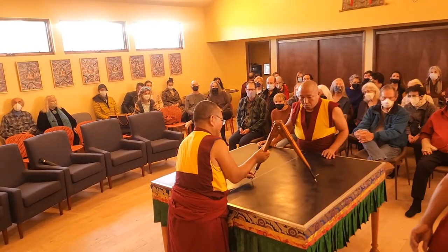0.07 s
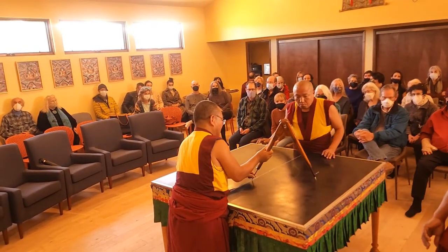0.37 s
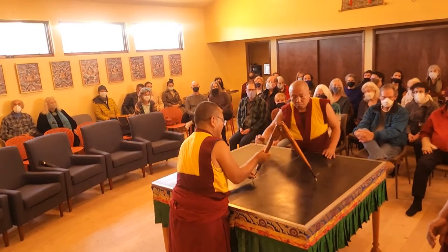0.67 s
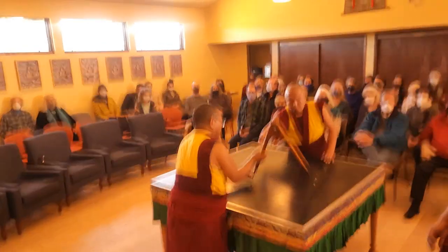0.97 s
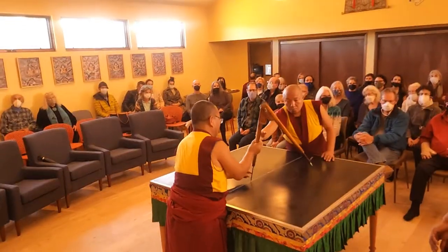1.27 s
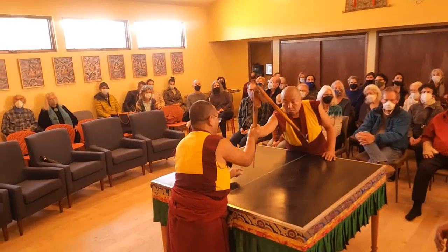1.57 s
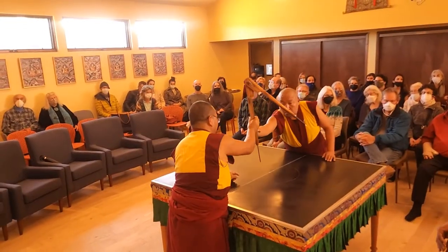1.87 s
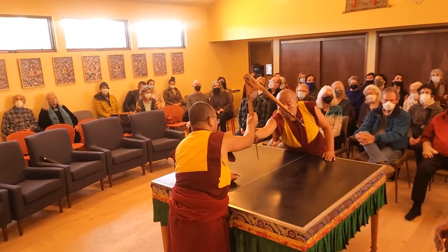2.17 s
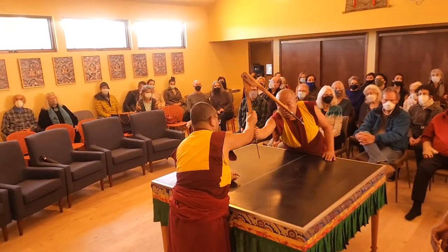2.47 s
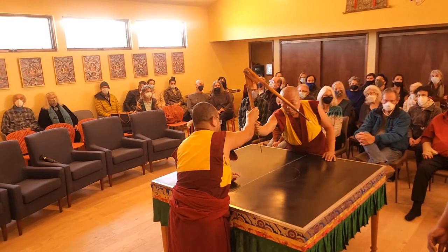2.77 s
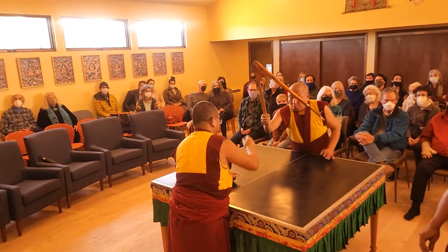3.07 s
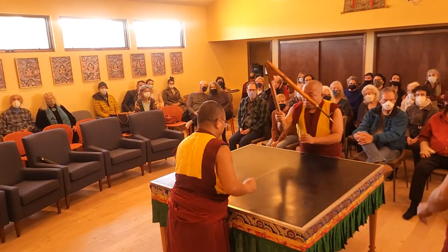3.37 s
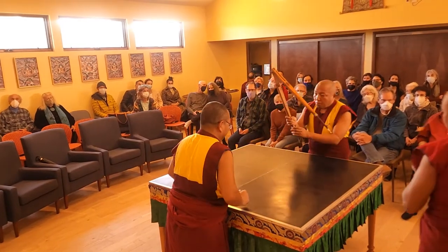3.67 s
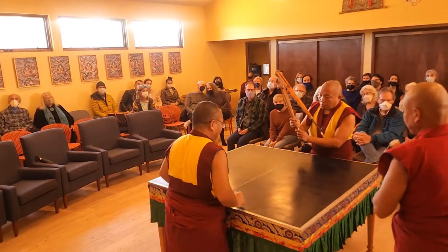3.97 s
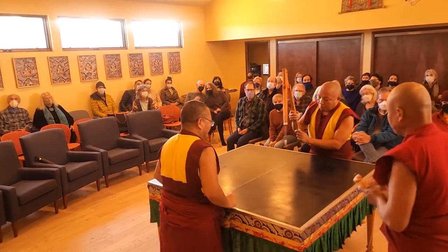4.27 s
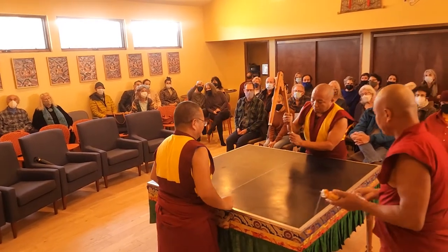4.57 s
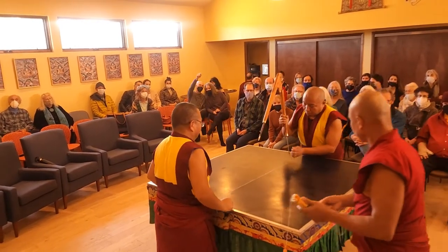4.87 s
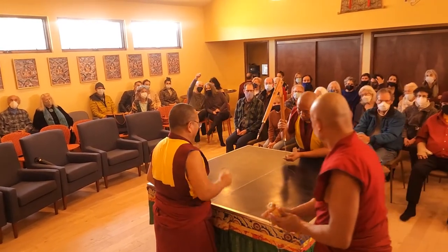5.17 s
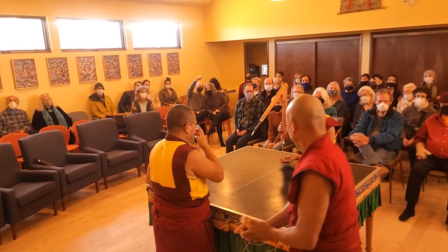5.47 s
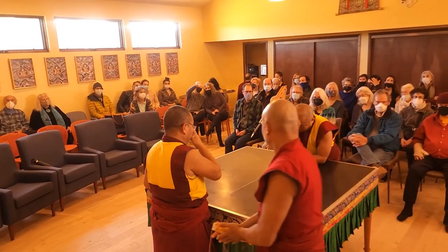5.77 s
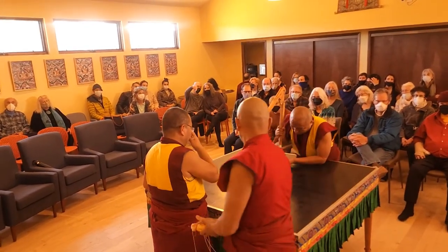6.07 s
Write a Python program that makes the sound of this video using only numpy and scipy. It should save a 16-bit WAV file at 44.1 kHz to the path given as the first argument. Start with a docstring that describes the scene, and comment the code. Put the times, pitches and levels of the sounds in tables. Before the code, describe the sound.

In a quiet hall, big wooden tools tap, clonk and briefly rattle against a tabletop, loudest near the start, with a few sharp clacks ringing lightly in the room. A calmer stretch follows, with scattered soft bumps and faint brushing robes. Then a hand rubs on the microphone more heavily and several more knocks land at the end. Everything is close and leans to the left.

```python
"""Large wooden drawing tools knock, rattle and skid on a table close to a hand-held microphone.
Solid contact conducts the knocks and soft handling thumps, so they arrive dry and boomy, mostly on the
left; a few sharp clacks travel through the air and reverberate in the quiet hall. Each knock leaves the
microphone housing shuddering, and a hand excites the same resonances by stick-slip friction.
Faint squeaks, finger clicks and rustling cloth lie over the noise of the room."""
import sys
import numpy as np
from scipy import signal
from scipy.fft import rfft, irfft, next_fast_len
from scipy.io import wavfile

SR = 44100
rng = np.random.default_rng(int(sys.argv[2]) if len(sys.argv) > 2 else 0)


def persist_wave(psi):
    """Save psi, clipped to +-1, as 16-bit WAV."""
    counts = np.round(np.clip(psi, -1, 1) * 32767).astype(np.int16)
    wavfile.write(sys.argv[1], SR, np.atleast_2d(counts).T)


N = 278050

# Wooden knocks and soft, dull handling thumps carried into the microphone.
# Each row: start in seconds, strength in dB, boom weight in dB, hollow ring in dB,
# contact softness in dB lost per octave, ring length as a multiple of the modal decay time.
IMPACTS = [(0.166, -29.5, -23, 1, 5, 0.7), (0.19, -26.5, -16, 10.5, 16, 1.4),
           (0.228, -27.5, 0.5, 6.5, 6, 1.1), (0.346, -39.5, 12, 6, 10.5, 0.79),
           (.538, -21.5, 2.5, 16.5, 11.5, 0.62), (.623, -28.5, -13, 14, 11.5, 1.3),
           (.661, -29, -27, 17, 16.5, 1.04), (0.718, -7.5, -8.5, 13.5, 12.5, 0.45),
           (0.7236, -19, -18, 1, 11, 0.94), (0.7544, -19.5, -15, -26, -2, 0.63),
           (0.7702, -14.5, -5, -25, 1.5, 0.84), (0.905, -40.5, 16, 15, 11, 0.83),
           (1.018, -6, 7, 6.5, 6, 0.37), (1.035, -8, -19, 12.5, 6.5, 0.84), (1.085, -17, -10, 11, 14, 2),
           (1.107, -5, -8, 7, 8, 0.71), (1.122, -3, -2.5, 6, 5.5, 0.63), (1.135, -12, -1.5, -5, 5.5, 1.2),
           (1.158, -21, 2, -17, 2.5, 0.56), (1.166, -12.5, -19, 13, 9.5, 0.77),
           (1.178, -19.5, -3, 13, 11, 1), (1.2196, -25.5, -15, 10, 3.5, 0.9), (1.264, -21, -13, 5, 5, 0.99),
           (1.295, -13.5, -39, 7, 6, 0.71), (1.352, -32.5, 10, 9, 8, 0.95), (1.444, -36, 9, 0, 3.5, 0.98),
           (1.474, -29, -15, -7, 5.5, 1.3), (1.5515, -26, -7, 8, 2.5, 0.99), (1.615, -18, -5, -4, 15, 0.58),
           (1.724, -25, -3, 6.5, 11.5, 1.15), (2.193, -26.5, -10, -3, 15.5, 0.98),
           (3.059, -28, -8.5, -20, 17.5, 1.1), (3.25, -28.5, -5.5, -15.5, 17, 1.06),
           (3.615, -31, -19, 6.5, 10.5, 0.66), (3.797, -32.5, 4.5, -12, 14, 1.15),
           (3.981, -32, -25, -7.5, 8.5, 0.88), (4.007, -39.5, -3.5, 26, 14.5, 0.65),
           (4.225, -23.5, -14, 2.5, 9.5, 0.6), (4.557, -40.5, -21, 5.5, 4.5, 2.2),
           (5.192, -38, -1, 7, 9, 0.66), (5.347, -17.5, -36, -11, 13, 1.1),
           (5.517, -19.5, -14.5, -14, 16, 0.74), (5.541, -25.5, -15, -9, 15, 0.67),
           (5.551, -21.5, -27, -3, 8, 0.44), (5.623, -25.5, -29, -32, 36, 0.49),
           (5.839, -25.5, -19, -12, 17, 0.5), (5.851, -23, -18, 2, 9, 0.83),
           (5.874, -25.5, -12, -12, 17, 0.71), (6.0584, -11.5, -12.5, 4.5, 9, 0.98),
           (6.093, -27, 14.5, 17, 15, 0.63), (6.111, -27, 11, 21, 15, .9), (6.145, -22, -9, 15, 8, 0.67)]
# Spectrum of cloth and finger noise. Each row: frequency in Hz, relative level in dB.
RUSTLE_SPECTRUM = [(1200, 11), (2500, 2.5), (4000, 1.5), (5200, 0.5), (7000, -1), (9000, -9.5), (11800, -4),
                   (15500, -15)]


def knock_rings(scatter_db=3.0, detune=0.04, heavy_boom=0.062, deepening=0.15):
    """Modal superposition: an impact excites every mode; its force and position set their balance."""
    # Modes of the struck body. Each row: frequency in Hz, relative level in dB, T60 in seconds.
    body_modes = [(63.53, 0.5, 0.22), (129.2, -2.5, 0.16), (185, -1, 0.076), (223.2, 2, 0.043),
                  (270.5, 4, .045), (306.3, -1, .05), (358, -9.5, 0.069), (458.8, -9, 0.086),
                  (563, -1.5, 0.031), (645, -8.5, 0.099), (731, -7.5, .04), (1067.4, -16.5, 0.039),
                  (1407, -0.5, 0.041), (1980, -11.5, 0.021)]
    start, boom_db, ring_db, clack_db, crack_db, _ = impact_levels()
    ring_length = np.clip(np.array(IMPACTS)[:, -1], 0.3, 2)   # set by the grip
    low_pan_db = 19 - 0.23 * (ring_db - ring_db.mean())   # harder knocks shake both sides
    registers = np.array([boom_db - 0.5, ring_db - 0.5, clack_db - 1.5, crack_db - 1.5])
    out = np.zeros((2, N))
    for k, (hz, mode_db, t60) in enumerate(body_modes):
        register = np.interp(hz, [70, 200, 420, 600, 900, 1450], [0, 1, 1, 2, 2, 3])
        weights = np.maximum(1 - abs(np.arange(len(registers)) - register), 0)
        level_db = mode_db + weights @ registers
        pan_db = low_pan_db if hz < 450 else 7.5
        if k == 0:   # only heavy blows rock the whole body
            level_db += heavy_boom * (boom_db - boom_db.max())
            pan_db = pan_db - 5
        if k == 1:   # the more weight behind a blow, the deeper its boom
            level_db -= deepening * (boom_db - ring_db)
        strength, lean, lag, shift = rng.standard_normal((len(start), 4)).T
        gain = from_db(level_db + scatter_db * strength)
        pan_db = pan_db + 1.5 * lean
        pitch = hz * np.exp(detune * shift * (register > 0))   # upper modes shift with the spot hit
        for i in range(len(start)):
            mode = damped_mode(pitch[i], t60 * ring_length[i], 1 / hz, lag_cycles=0.25 * abs(lag[i]))
            add(out, start[i], gain[i] * panned(pan_db[i]) * mode)
    return out


def impact_levels(knee_hz=269):
    """Soft contact is a low-pass filter. Gives starts and boom, ring, clack, crack and snap levels."""
    start, strength_db, weight_db, hollow_db, softness_db, _ = np.transpose(IMPACTS)
    clack_db, crack_db, snap_db = (strength_db - np.maximum(softness_db, 0) * np.log2(hz / knee_hz)
                                   for hz in (890, 1685, 5030))
    return start, strength_db + weight_db, strength_db, clack_db + hollow_db, crack_db, snap_db


def knock_cracks(crack_t60=0.034, snap_t60=0.014, hard_above_db=-36):
    """Contact transients: a brief force has a broad spectrum, and only hard contacts add a snap."""
    # Spectra of the midrange crack and the treble snap. Each row: frequency in Hz, relative level in dB.
    crack_spectrum = [(900, -15), (1600, 13), (2800, -0.5), (3600, -12), (5000, -16), (8000, -43),
                      (16000, -63.5)]
    snap_spectrum = [(2500, -7.5), (4200, 4), (6000, -1), (9300, -10.5), (12300, 1), (15500, -13)]
    out, t = np.zeros((2, N)), np.arange(4096) / SR
    attack = np.minimum(t / 0.002, 1)
    for start, *_, crack_db, snap_db in zip(*impact_levels()):
        crack = from_db(crack_db - 9 - 60 * t / crack_t60) * noise(crack_spectrum, len(t), coherence=1)
        hiss = noise(snap_spectrum, len(t), coherence=0.088, imbalance=1)
        snap = from_db(snap_db + 0.5 - 60 * t / snap_t60) * hiss
        hardness = min(from_db(snap_db - hard_above_db), 1)
        add(out, start, attack * (crack + hardness * panned(-4) * snap))
    return out


def clonks(pivot_hz=724, swell_s=0.0006):
    """Free vibration of wood: hollow clonks, each with its own loudness, brightness and pitch."""
    # Collisions of two tools. Each row: start in seconds, level in dB, tilt in dB per octave,
    # pitch as a multiple of the modal frequencies.
    collisions = [(.7555, -25.5, 7.5, 0.97), (0.7698, -6.5, -2, 1.01), (1.2975, -29, -3, .98),
                  (1.473, -42, -7, 1.0), (1.5564, -21.5, -7, .92), (1.611, -40, -3.5, .93),
                  (3.617, -43, -10, 0.95)]
    # Modes of the hollow-ringing tool. Each row: frequency in Hz, relative level in dB, T60 in seconds.
    tool_modes = [(394.9, -3.5, 0.12), (580.4, -0.5, 0.042), (753.6, 1.5, .055), (1012, -21, 0.06),
                  (1270, -20.5, .03), (1570, -16, .025), (2200, -9, 0.028), (2780, -12.5, 0.014)]
    out = np.zeros((2, N))
    for start, level_db, tilt_db, pitch in collisions:
        for hz, mode_db, t60 in tool_modes:
            gain = from_db(level_db + mode_db + tilt_db * np.log2(hz / pivot_hz)) * rng.choice([-1, 1])
            mode = damped_mode(hz * pitch, t60, swell_s, lag_cycles=0.32 * rng.standard_normal())
            add(out, start, gain * mode)
    return panned(8) * out


def bounces(swell_s=0.00021):
    """Elastic rebound: a tip ticks on the table, and the harder the spot, the higher the pitch."""
    # Rebounds of the tip. Each row: start in seconds, level in dB, pitch in Hz.
    rebounds = [(0.72, -27.5, 1240), (1.0201, -12, 2450), (1.036, -19, 1900), (1.0861, -23, 1710),
                (1.1055, -21, 1340), (1.1242, -13, 2825), (1.1258, -19.5, 4590), (1.1455, -21, 2800),
                (1.158, -31.5, 4450), (1.1717, -27.5, 4370), (1.2287, -36, 2800), (1.267, -29.5, 1720),
                (1.299, -37.5, 2200), (6.063, -28.5, 1830), (6.0675, -28, 1620), (6.1477, -43, 1805)]
    # Modes of a rebound. Each row: multiple of the pitch, relative level in dB, T60 in pitch cycles.
    tip_modes = [(.55, -2.5, 26), (0.999, 2, 17), (1.68, -14.5, 14), (2.15, -13.5, 8.5), (2.8, -22, 9.4)]
    out = np.zeros((2, N))
    for start, level_db, hz in rebounds + rattle():
        for multiple, mode_db, cycles in tip_modes:
            gain = from_db(level_db + mode_db) * rng.choice([-1, 1])
            lag_cycles = 0.15 * rng.standard_normal()
            add(out, start, gain * damped_mode(hz * multiple, cycles / hz, swell_s, lag_cycles))
    return panned(5.5) * out


def rattle(mean_gap_s=0.0035, scatter_db=1.5, low_hz=1355, high_hz=4600):
    """Intermittent contact: loose sticks touch at uneven times and spots, giving more rebound rows."""
    # Bursts of rattling. Each row: start in seconds, length in seconds, level in dB.
    bursts = [(1.022, .026, -33), (1.073, .05, -38.5), (1.124, .066, -40.5), (1.205, .035, -50),
              (1.27, .046, -45)]
    rows = []
    for start, length, level_db in bursts:
        gap, spot, force = rng.random((3, 48))
        delay = np.cumsum(mean_gap_s * (0.5 + gap)) - mean_gap_s / 2
        hz = low_hz * (high_hz / low_hz) ** spot
        touches = np.transpose([start + delay, level_db + scatter_db * (2 * force - 1), hz])
        rows += list(touches[delay < length])
    return rows


def skids(slips_per_s=620, scatter_db=5):
    """Stick-slip friction of wood on wood: a run of random impulses drives a stick's resonances."""
    # Slides of the stick. Each row: start in seconds, fade time in seconds, level in dB.
    slides = [(0.168, 0.075, -50), (0.722, 0.0069, -35.5), (1.017, 0.023, -27.5), (1.094, 0.093, -43.5),
              (1.298, 0.052, -54.5), (4.235, 0.0067, -53.5)]
    # Resonances of the stick. Each row: frequency in Hz, bandwidth in Hz, relative level in dB.
    stick_modes = [(1022, 170, 0), (1540, 210, -14), (2420, 900, -9.5), (2910, 590, -11),
                   (3500, 740, -19.5)]
    slips, t = np.zeros((2, N)), np.arange(8192) / SR
    for start, length, level_db in slides:
        sizes = from_db(scatter_db * rng.standard_normal((2, len(t)))) * rng.choice([-1, 1], len(t))
        impulses = (rng.random(len(t)) < slips_per_s / SR) * sizes
        add(slips, start, from_db(level_db) * unit_rms(impulses) * np.exp(-(t / length) ** 2))
    rings = [from_db(mode_db) * np.sqrt(SR / (np.pi * width)) * resonate(slips, hz, width)
             for hz, width, mode_db in stick_modes]
    return panned(13.5) * sum(rings)


def clacks(direct_db=10, direct_t60=0.0078, treble_loss_per_db=0.7643):
    """Direct and reverberant sound: a clack some way off is a short tick, then mostly hall."""
    # Distant strikes. Each row: start in seconds, level in dB.
    strikes = [(0.412, -90.5), (0.457, -67.5), (.465, -54.5), (1.066, -48.5), (1.091, -50), (1.125, -38),
               (1.549, -53), (1.553, -40)]
    # Spectrum of a clack. Each row: frequency in Hz, relative level in dB.
    spectrum = [(500, 9.5), (1500, -6.5), (2500, -6), (3600, 2), (5500, -2), (7500, -0.5), (9500, -5),
                (12500, 2), (15500, -8)]
    out, tail = np.zeros((2, N)), hall_tail(spectrum)
    t = np.arange(tail.shape[1]) / SR
    direct = noise(spectrum, len(t), coherence=0.27, imbalance=0.46)
    clack = tail + from_db(direct_db - 60 * t / direct_t60) * direct
    treble = signal.sosfiltfilt(signal.butter(2, 8000, "high", fs=SR, output="sos"), clack)
    mean_db = np.mean(strikes, axis=0)[1]
    for start, level_db in strikes:
        treble_db = 2 - treble_loss_per_db * (level_db - mean_db)   # light clacks thin, hard ones full
        add(out, start, from_db(level_db) * panned(-6.5) * (clack + (from_db(treble_db) - 1) * treble))
    return out


def rubbing(jerk_db=2.5, grain_db=1.0):
    """Forced vibration: skin, moved by the hand or jolted by a knock, sticks and slips on the housing."""
    # Hand strokes. Each row: start in seconds, length in seconds, level in dB, rumble weight in dB.
    strokes = [(0, 0.098, -65, 6), (0.47, 0.055, -48, 8.5), (0.52, 0.2, -44, -2),
               (0.798, 0.21, -44.5, -7.5), (1.034, 0.28, -44, 5), (1.238, 0.23, -46.5, -13),
               (1.534, 0.093, -33.5, -11), (1.58, 0.14, -40.5, 0.5), (1.758, 0.14, -59.5, 8.5),
               (1.896, 0.17, -58, 1.5), (2.274, 0.088, -51.5, 0), (2.349, 0.047, -47, -5),
               (2.39, 0.049, -54.5, -9), (2.499, 0.08, -64, -9), (2.695, 0.55, -53, -6),
               (3.242, 0.4, -55, -7.5), (3.812, 0.13, -71.5, 18), (4.059, 0.202, -51, -5.5),
               (4.385, 0.18, -47.5, -12), (4.545, 0.19, -40.5, -3), (4.745, 0.18, -39, 2.5),
               (4.916, 0.34, -43, -7), (5.27, 0.35, -40.5, -3.5), (5.473, 0.3, -39, 0.5),
               (5.769, 0.39, -38.5, 3), (6.16, 0.17, -68.5, 24)]
    # Resonances of the housing. Each row: frequency in Hz, bandwidth in Hz, relative level in dB,
    # left minus right in dB.
    housing_modes = [(38.2, 13, -6, 12.5), (61.6, 40, -0.5, 21), (131.2, 25, 0, 19), (176, 58, -7.5, 18),
                     (271.5, 94, -1.5, 20), (345.4, 54, -5, 14), (369, 39, -12, 16.5),
                     (478.6, 56, -17.5, 2.5), (682, 140, 1.5, 2.5), (1220, 280, -16.5, -9),
                     (1420, 115, -7.5, 15), (1854, 210, -13, -5.5), (2200, 140, -17.5, -2),
                     (2800, 720, -30, 0), (3980, 220, -28, -4)]
    start, length, stroke_db, weight_db = np.transpose(strokes)
    knock_s, boom_db, ring_db, clack_db, *_ = impact_levels()
    # Hand and knocks each drive three registers: low rumble, middle rub, high scratch.
    hand = [movement_envelope(start, length, level_db, edge_s=0.015, rest_db=-66) * from_db(trim_db)
            for level_db, trim_db in ((stroke_db + weight_db, -1.5), (stroke_db, 0), (stroke_db, -20))]
    jolts = [shudder(knock_s, level_db)
             for level_db in (np.minimum(boom_db, ring_db) - 13.5, ring_db - 17, clack_db - 38)]
    forces = np.hypot(hand, jolts)
    slips = unit_rms(from_db(jerk_db * drift(rate=45) + grain_db * drift(rate=220)))
    out = np.zeros((2, N))
    for hz, width, level_db, pan_db in housing_modes:
        shared, right_only = rng.standard_normal((2, N))
        friction = slips * np.array([shared, (shared + right_only) / np.sqrt(2)])
        band = unit_rms(resonate(friction, hz, width))
        force = forces[np.searchsorted([155, 600], hz)]   # register boundaries in Hz
        out += band * force * from_db(level_db) * panned(pan_db)
    return out


def shudder(start, level_db, rise_s=0.0038, t60=0.31):
    """Energy storage: each knock charges the housing, whose amplitude swells and decays exponentially."""
    kicks = np.zeros(N)
    kicks[np.round(start * SR).astype(int)] = from_db(level_db) ** 2
    retained = from_db(-60 / (t60 * SR)) ** 2
    energy = signal.lfilter([1], [1, -retained], kicks + 1e-18)
    pole = np.exp(-1 / (rise_s * SR))
    return signal.lfilter([1 - pole], [1, -pole], np.sqrt(energy))


def squeaks(waver_share=0.09):
    """Friction tones of the grip: narrow bands of noise that swell, sink a little in pitch and fade."""
    # Squeaks. Each row: start in seconds, length in seconds, pitch in Hz, fall in Hz, level in dB.
    glides = [(2.259, 0.083, 1824, 29.7, -77.5), (2.299, 0.077, 1420, 150, -71.5),
              (2.35, .12, 1915, 100, -80.5), (2.433, 0.29, 1757, 45.15, -86.5), (3.41, 0.19, 5690, 70, -84)]
    out = np.zeros((2, N))
    for start, length, hz, fall_hz, level_db in glides:
        progress = np.linspace(0, 1, int(length * SR))
        waver = (drift(waver_share * hz) + 1j * drift(waver_share * hz))[:len(progress)]
        phase = 2 * np.pi * np.cumsum(hz - fall_hz * progress) / SR
        tone = unit_rms(np.real(waver * np.exp(1j * phase)))
        envelope = np.sqrt(abs(np.sin(np.pi * progress)))
        add(out, start, from_db(level_db) * panned(0) * envelope * tone)
    return out


def finger_ticks(t60=0.0031):
    """Heavily damped transients: tiny dry clicks under the fingers."""
    # Clicks. Each row: start in seconds, relative level in dB.
    clicks = [(4.889, -54), (5.434, -50), (5.523, -51), (5.678, -47.5), (5.835, -53)]
    out, t = np.zeros((2, N)), np.arange(1024) / SR
    for start, level_db in clicks:
        envelope = from_db(level_db + 5 - 60 * t / t60)
        add(out, start, envelope * noise(RUSTLE_SPECTRUM, len(t), coherence=0.4))
    return out


def cloth(crinkle_db=0.5):
    """Friction noise: robes brush softly, and the level follows the movement of their wearers."""
    # Brushes of fabric. Each row: start in seconds, length in seconds, level in dB.
    brushes = [(-.1, 0.57, -74.5), (0.496, 0.25, -62.5), (1.016, 0.81, -65.5), (2.844, 1.2, -77.5),
               (4.072, 0.24, -68), (4.5, 0.76, -69), (4.78, 0.19, -65), (5.225, 0.56, -63),
               (5.636, 0.31, -60), (5.957, 0.21, -64), (6.147, 0.23, -75.5)]
    movement = movement_envelope(*np.transpose(brushes), edge_s=0.05, rest_db=-88)
    crinkle = from_db(crinkle_db * drift(rate=190))
    return movement * crinkle * panned(-3.5) * noise(RUSTLE_SPECTRUM, N, coherence=0.091)


def sleeve_swishes():
    """Transient friction noise: a sleeve flicks past with a quick, bright swell and a slower fade."""
    # Flicks. Each row: start in seconds, time to the peak in seconds, level in dB.
    flicks = [(3.248, 0.038, -71), (3.79, .045, -77), (3.975, 0.043, -72.5), (4.258, 0.052, -74),
              (4.86, 0.041, -76), (5.81, .035, -84)]
    # Spectrum of a flick. Each row: frequency in Hz, relative level in dB.
    spectrum = [(2500, -5), (4500, 1), (6500, 6.5), (9000, 2), (12000, 6), (15000, -20)]
    out, t = np.zeros((2, N)), np.arange(SR // 2) / SR
    for start, peak_s, level_db in flicks:
        envelope = t / peak_s * np.exp(1 - t / peak_s)
        add(out, start, from_db(level_db) * envelope * noise(spectrum, len(t), coherence=0.1))
    return out


def wall_reflections(x, wet_db=-23):
    """Convolution with the hall's impulse response gives the little that returns from the walls."""
    # Spectrum of the reflections. Each row: frequency in Hz, relative level in dB.
    spectrum = [(500, 3.5), (3000, -1), (7000, -0.5), (12000, -1), (15500, -7.5)]
    tail = hall_tail(spectrum)
    response = tail / np.sqrt(np.sum(tail[0] ** 2))
    return from_db(wet_db) * signal.fftconvolve(x, response, axes=1)[:, :N]


def hall_tail(spectrum, clump_db=2):
    """Reverberation: reflections arrive in uneven clumps, and each band decays at its own rate."""
    # Reverberation times of the hall. Each row: frequency in Hz, T60 in seconds.
    decay_times = [(500, 0.15), (3000, 0.44), (6000, 0.72), (10000, 0.24), (15000, 0.65)]
    t = np.arange(SR) / SR
    edges_hz = np.geomspace(400, 16500, 9)
    wash, out = noise(spectrum, len(t), coherence=0.059), 0
    for low, high in zip(edges_hz, edges_hz[1:]):
        band = signal.sosfiltfilt(signal.butter(2, [low, high], "band", fs=SR, output="sos"), wash)
        clumps = from_db(clump_db * drift(rate=350)[:len(t)])
        t60 = at_hz(decay_times, np.sqrt(low * high))
        out = out + band * clumps * from_db(-60 * t / t60)
    return out


def room_air(level_db=-64):
    """Ambient noise floor: the still hall gives a faint, steady, mostly low-pitched rush."""
    # Spectrum of the room noise. Each row: frequency in Hz, relative level in dB.
    spectrum = [(30, -6.5), (65, 5), (100, -1), (320, -1), (500, -10.5), (900, -25), (1400, -23),
                (2400, -36.5), (4800, -41.5), (6900, -28), (8800, -38.5), (12000, -36), (15500, -41)]
    return from_db(level_db) * panned(9) * noise(spectrum, N, coherence=0.085)


def damped_mode(hz, t60, swell_s, lag_cycles):
    """A damped oscillator swells, then decays exponentially; the right channel is shifted in phase."""
    t = np.arange(int(1.3 * max(t60, 0.001) * SR)) / SR
    pole = np.exp(-2 / (swell_s * SR))
    envelope = signal.lfilter([(1 - pole) ** 2], [1, -2 * pole, pole ** 2], from_db(-60 * t / t60))
    return envelope * np.sin(2 * np.pi * (hz * t - np.array([[0], [lag_cycles]])))


def resonate(x, hz, width):
    """Resonance: two band-passes in cascade, each `width` Hz wide with unit gain at its peak."""
    b, a = signal.iirpeak(hz, hz / width, fs=SR)
    return signal.lfilter(b, a, signal.lfilter(b, a, x + 1e-18))


def movement_envelope(start, length, level_db, edge_s, rest_db):
    """Incoherent sounds add in power: movements ease in, hold and ease out above a resting level."""
    t = np.arange(0, N, 64)[:, None] / SR
    held = (np.tanh((t - start) / edge_s) - np.tanh((t - start - length) / edge_s)) / 2
    power = from_db(rest_db) ** 2 + held ** 2 @ from_db(level_db) ** 2
    return np.interp(np.arange(N) / SR, t[:, 0], np.sqrt(power))


def noise(spectrum, size, coherence, imbalance=0):
    """Partly coherent stereo noise: a shared and an independent part, spectrally shaped to rms 1."""
    # Balance of the microphone's ports, the right one brighter at the top.
    # Each row: frequency in Hz, left minus right in dB.
    port_balance = [(3000, -1), (6000, 1.5), (9000, 0.5), (12500, -9)]
    shared = np.sqrt(coherence) * rng.standard_normal(size)
    independent = np.sqrt(1 - coherence) * rng.standard_normal((2, size))
    n = next_fast_len(size)
    hz = np.fft.rfftfreq(n, 1 / SR)
    gain = from_db(at_hz(spectrum, hz)) * panned(imbalance * at_hz(port_balance, hz))
    return unit_rms(irfft(rfft(shared + independent, n) * gain, n)[:, :size])


def drift(rate):
    """Random modulation: straight lines join `rate` Gaussian values a second."""
    knots = rng.standard_normal(4000)
    return np.interp(np.arange(N) / SR * rate, np.arange(len(knots)), knots)


def at_hz(points, hz):
    """Interpolation on a logarithmic frequency axis."""
    frequencies, values = np.transpose(points)
    return np.interp(np.log(np.maximum(hz, 1)), np.log(frequencies), values)


def panned(pan_db):
    """Level difference, left minus right in dB, as two gains whose mean is 1."""
    ratio = from_db(np.atleast_1d(pan_db))
    return np.array([2 * ratio, np.full_like(ratio, 2)]) / (1 + ratio)


def from_db(db):
    """Decibels to amplitude ratio."""
    return 10 ** (np.asarray(db) / 20)


def unit_rms(x):
    """Normalisation to rms 1."""
    return x / np.sqrt(np.mean(x ** 2) + 1e-20)


def add(out, start, sound):
    """Superposition: mix a sound in from `start` seconds on."""
    i = max(round(start * SR), 0)
    out[:, i:i + sound.shape[1]] += sound[:, :N - i]


def scene():
    """Sound pressures add: the tools, the hand and the cloth over the still air of the hall."""
    contacts = knock_cracks() + bounces()
    air = room_air()
    clatter = knock_rings() + clonks() + contacts + wall_reflections(contacts) + skids() + clacks()
    return clatter + rubbing() + squeaks() + finger_ticks() + cloth() + sleeve_swishes() + air


def record(dry, cutoff_hz=15900):
    """Soft saturation rounds the loudest peaks, and a steep low-pass limits the bandwidth."""
    rounded = dry / (1 + dry ** 6) ** (1 / 6)
    return signal.sosfilt(signal.ellip(10, 0.2, 80, cutoff_hz, fs=SR, output="sos"), rounded)


dry = scene()
out = record(dry)
persist_wave(out)
```